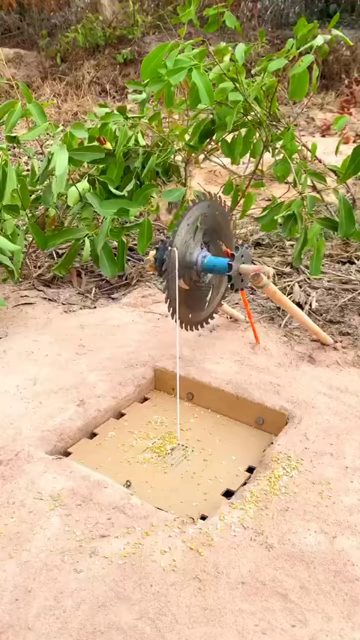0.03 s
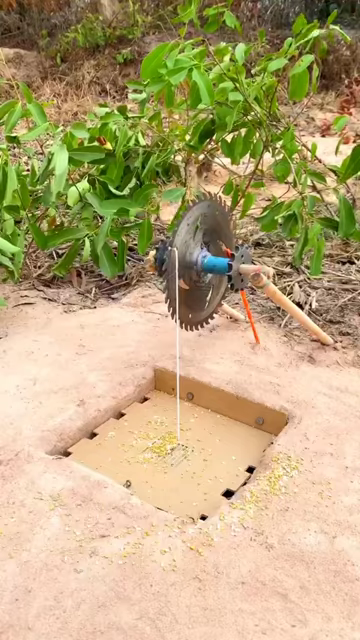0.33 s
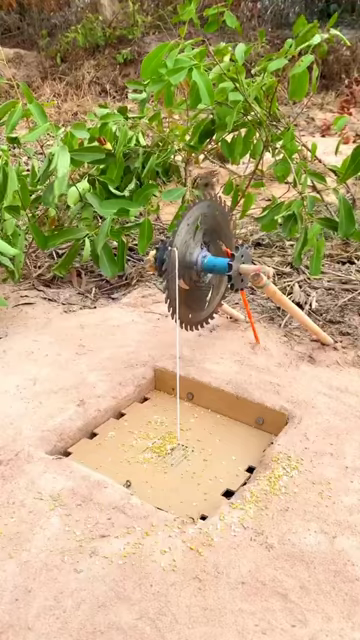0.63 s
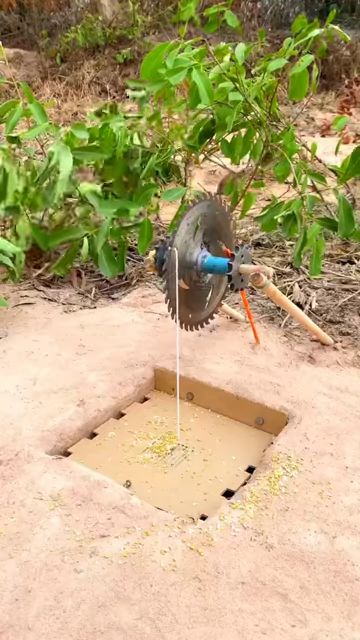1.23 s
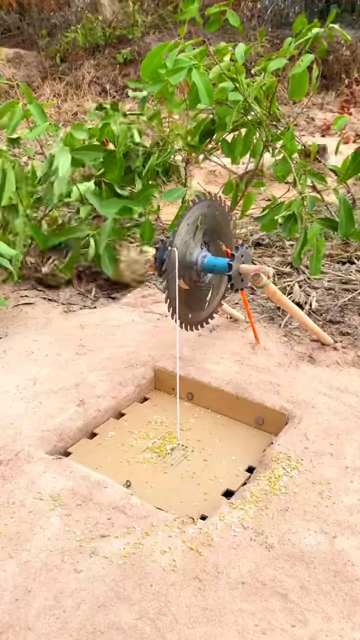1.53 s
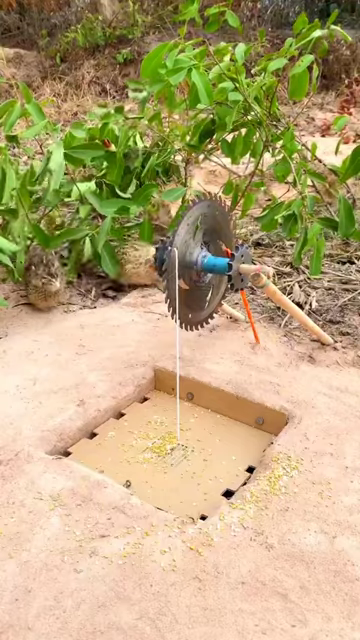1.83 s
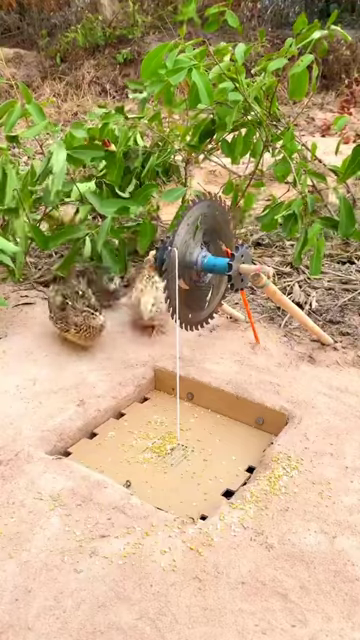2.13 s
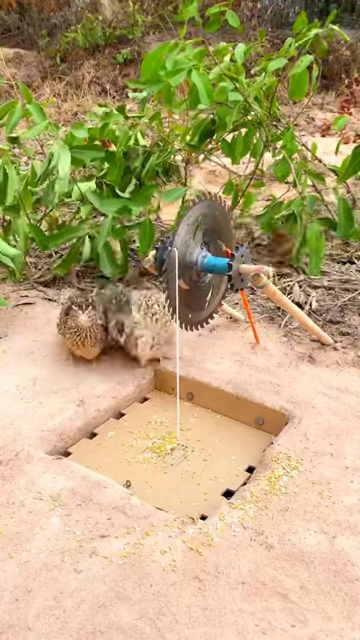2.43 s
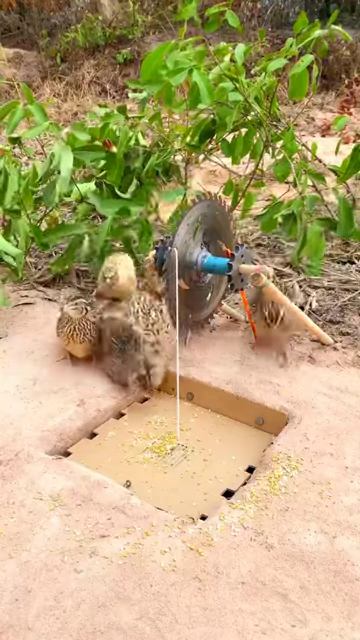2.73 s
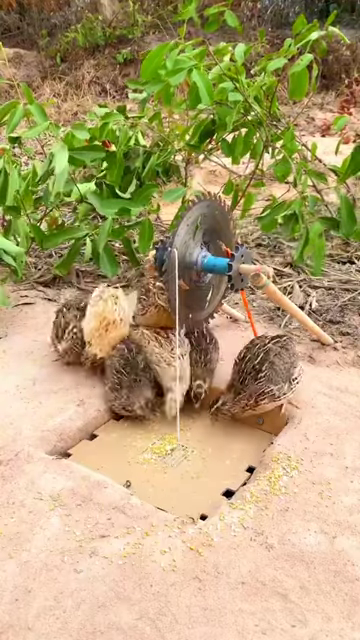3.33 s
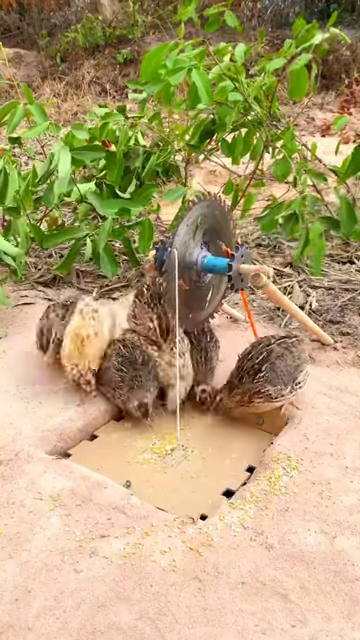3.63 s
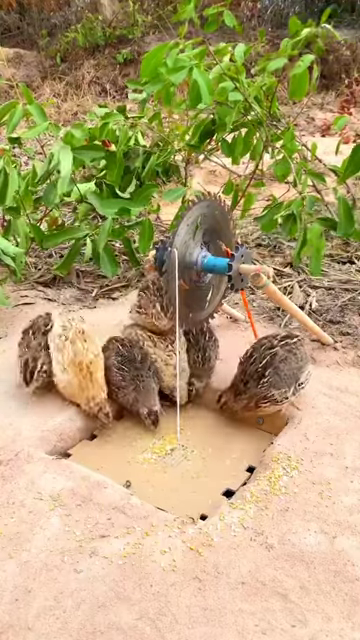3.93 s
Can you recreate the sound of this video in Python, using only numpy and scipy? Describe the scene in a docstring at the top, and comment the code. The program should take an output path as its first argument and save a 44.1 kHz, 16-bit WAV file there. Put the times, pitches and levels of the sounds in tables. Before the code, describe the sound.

In a quiet garden, small birds approach with soft footsteps, light rustling and a few faint peeps. Then comes the main sound, a louder flurry of beaks tapping on cardboard nearby, with brief claw scrapes.

```python
"""Quail peck grain off a cardboard flap set over a hollow. Each peck spreads through the card as a
bending wave, in which high notes travel faster: the tick arrives first, the low thump a moment later.
The birds also patter over dry ground and push through a leafy bush. Leaves rustle, twigs snap,
claws scrape and faint peeps sound over the low rumble of a quiet garden."""
import sys
import numpy as np
from scipy import signal
from scipy.fft import rfft, irfft, next_fast_len
from scipy.io import wavfile
from scipy.ndimage import map_coordinates

SR = 44100
rng = np.random.default_rng(int(sys.argv[2]) if len(sys.argv) > 2 else 0)


def pcm_store(signal):
    """Save signal as 16-bit PCM."""
    levels = np.round(np.clip(np.atleast_2d(signal), -1, 1) * 32767)
    wavfile.write(sys.argv[1], SR, levels.astype(np.int16).T)


N = 176400
SIZE = 16384  # samples in one short sound; HZ and T are its frequencies and times
HZ, T = np.fft.rfftfreq(SIZE, 1 / SR) + 1e-3, np.arange(SIZE) / SR
LEAD_S = 256 / SR  # spare time ahead of a hit, so its start is not cut off

# The card's low modes (notes it rings at). Each row: pitch in Hz, width in Hz, relative level in dB.
KNOCK_MODES = [(283.3, 79, 7), (432, 69, -1.5)]
# The card's high modes. Each row: pitch in Hz, width in Hz, relative level in dB.
TICK_MODES = [(675, 160, 0), (1130, 260, -1.5), (1670, 270, -7), (2380, 310, -14.5), (3090, 480, -14.5),
              (3800, 600, -25), (5400, 1700, -25.5), (10000, 4000, -34)]


def amp(db):
    """Turn decibels into a number to multiply by."""
    return 10 ** (np.asarray(db) / 20)


def even_energy(x):
    """Give a short sound the energy of 30 ms at strength 1."""
    return x / np.sqrt(np.sum(x ** 2) / (0.03 * SR) + 1e-20)


def along(points, hz):
    """Read between (Hz, value) points, with octaves evenly spaced."""
    freqs, values = np.transpose(points)
    return np.interp(np.log(hz + 1), np.log(freqs + 1), values)


def add(track, start, x):
    """Mix x into the track at a start time in seconds."""
    i = max(round(start * SR), 0)
    track[i:i + len(x)] += x[:max(N - i, 0)]


def wobble(rate, size=N):
    """A smooth curve through `rate` random values a second."""
    return map_coordinates(rng.standard_normal(int(size * rate / SR) + 4), [np.arange(size) * rate / SR])


def level(rows, flutter_db, rate):
    """Follow (seconds, dB) points, with a random flutter."""
    return amp(np.interp(np.arange(N) / SR, *np.transpose(rows)) + flutter_db * wobble(rate))


def filtered(x, response):
    """Turn each frequency of x up or down by response(hz)."""
    padded = next_fast_len(N + SR // 2)
    return irfft(rfft(x, padded) * response(np.fft.rfftfreq(padded, 1 / SR)), padded)[:N]


def coloured(x, colour):
    """Shape the tone of x by (Hz, dB) points and bring it to strength 1."""
    x = filtered(x, lambda hz: amp(along(colour, hz)))
    return x / np.sqrt(np.mean(x ** 2) + 1e-20)


def resonance(hz, width):
    """How one mode answers each frequency; a wider mode dies away sooner."""
    return 1j * HZ * width / (hz * hz - HZ ** 2 + 1j * HZ * width)


def ground():
    """Dull shuffling on the soil over an uneven low rumble."""
    # How loud each is over time. Each row: time in seconds, relative level in dB.
    shuffle_levels = [(0.0, -69.5), (0.39, -63.5), (0.54, -75), (0.84, -65.5), (1.08, -50), (1.22, -48.5),
                      (1.46, -71), (1.62, -68.5), (1.86, -59.5), (2.39, -58.5), (2.73, -51), (2.96, -41),
                      (3.3, -43), (3.35, -28), (3.46, -41), (3.67, -40.5), (3.87, -46.5), (3.96, -41)]
    rumble_levels = [(0.0, -77), (0.07, -41.5), (0.13, -89), (0.45, -65), (0.51, -86), (0.89, -74),
                     (1.01, -53.5), (1.12, -50), (1.16, -38.5), (1.31, -74), (1.92, -56.5), (1.93, -66),
                     (2.48, -52.5), (2.53, -74), (2.68, -44), (2.72, -76), (2.75, -44), (3.26, -56),
                     (3.29, -39), (3.35, -61), (3.41, -52), (3.48, -59), (3.6, -39), (3.64, -54),
                     (3.77, -48), (3.79, -41), (3.88, -43), (3.9, -33.5), (3.95, -46.5), (3.97, -32)]
    # The tone of each. Each row: frequency in Hz, relative level in dB.
    soil_colour = [(40, -8), (120, 14.5), (220, -5), (320, 4.5), (600, -6), (900, -27), (2200, -28.5),
                   (5000, -44.5)]
    rumble_colour = [(15, -14), (45, 1.5), (100, 0), (170, -12.5), (400, -16.5), (1500, -70)]
    shuffle = coloured(rng.standard_normal(N), soil_colour) * level(shuffle_levels, flutter_db=2, rate=16)
    rumble = coloured(rng.standard_normal(N), rumble_colour) * level(rumble_levels, flutter_db=-2, rate=5)
    return amp(-5.5) * shuffle + amp(0.5) * rumble


def leaves():
    """Leaves slide over feathers with a hiss and many small crackles."""
    # The rustle before and during feeding. Each row: time in seconds, relative level in dB.
    walking = [(0.0, -75), (0.06, -74.5), (0.09, -66), (0.2, -77.5), (0.28, -65), (0.35, -71), (0.36, -63),
               (0.41, -71.5), (0.73, -78.5), (0.74, -73), (0.86, -78.5), (0.88, -68.5), (0.91, -69),
               (0.94, -74), (0.96, -67), (1.25, -53), (1.25, -48), (1.28, -60), (1.33, -66.5), (1.6, -66),
               (1.69, -73), (1.73, -61), (1.79, -71.5), (1.95, -63), (2.14, -71.5), (2.32, -65.5),
               (2.36, -72), (2.38, -63.5), (2.4, -73.5), (2.41, -54.5), (2.43, -67), (2.47, -61.5),
               (2.49, -69.5), (2.62, -65)]
    feeding = [(2.64, -56), (2.74, -72.5), (2.8, -75), (2.87, -69), (2.92, -65), (2.96, -62.5), (3.02, -74),
               (3.06, -65), (3.11, -60.5), (3.15, -73.5), (3.22, -81), (3.27, -71), (3.33, -66),
               (3.37, -66), (3.43, -65), (3.49, -71), (3.52, -77), (3.58, -55), (3.65, -80), (3.69, -63),
               (3.74, -77.5), (3.79, -60), (3.84, -69), (3.9, -65.5), (3.99, -65)]
    # The tone of hiss and crackle. Each row: frequency in Hz, relative level in dB.
    hiss_colour = [(200, 10), (600, 17.5), (1000, 1), (2400, 7), (3500, 2), (4700, 3), (6300, -1),
                   (9000, 0), (11500, 1), (16000, -6.5)]
    crackle_colour = [(300, -15), (700, 5.5), (1200, 5.5), (2500, -5.5), (3600, -10), (4700, 6.5),
                      (6500, -12), (12000, -20)]
    cracks_per_s, usual_push = 700, amp(-50.5)
    push = level(np.vstack([walking, feeding]), flutter_db=2.3, rate=60)
    cracks = (rng.random(N) < cracks_per_s / SR) * rng.choice([-1, 1], N)
    sizes = amp(4 * np.minimum(rng.exponential(size=N), 4))
    # With a harder push, the crackle grows faster than the hiss.
    crackle = coloured(cracks * sizes, crackle_colour) * usual_push * (push / usual_push) ** 1.34
    hiss = coloured(rng.standard_normal(N), hiss_colour) * push
    return amp(4) * hiss + amp(-5) * crackle


def peeps():
    """The birds call in short, husky, sliding notes."""
    # Each row: start in seconds, length in seconds, first pitch in Hz, last pitch in Hz, level in dB.
    calls = [(0.039, 0.067, 1276, 1208, -60), (0.064, 0.041, 2300, 1690, -62.5),
             (0.163, 0.038, 2900, 2970, -74.5), (0.288, 0.025, 2110, 1870, -69),
             (0.461, 0.053, 2330, 2650, -67.5), (.498, 0.049, 755, 670, -58.5),
             (0.499, 0.041, 1240, 1326, -65.5), (0.718, 0.043, 1994, 1580, -65.5),
             (0.795, 0.038, 1095, 960, -68.5), (0.946, 0.031, 2340, 2210, -63.5),
             (1.791, 0.048, 1980, 1890, -72), (1.993, 0.049, 1302, 1345, -66.5),
             (2.059, 0.053, 1080, 1216, -61.5), (2.222, 0.044, 1166, 1260, -64),
             (2.975, 0.074, 2050, 2260, -54), (3.217, 0.034, 1310, 1440, -58),
             (3.589, 0.023, 3050, 2960, -49.5)]
    out = np.zeros(N)
    for start, length, start_hz, end_hz, db in calls:
        progress = np.minimum(T / length, 1)
        pitch = start_hz + (end_hz - start_hz) * progress
        rasp = wobble(rate=550, size=SIZE)
        phase = 2 * np.pi * np.cumsum(pitch) / SR + rasp
        flutter = amp(3.8 * wobble(rate=135, size=SIZE))
        note = (np.sin(phase) + amp(-20) * np.sin(2 * phase)) * flutter
        add(out, start, amp(db) * even_energy(note * np.sin(np.pi * progress)))
    return out


def snaps():
    """A burst of breaking fibres rings a twig's two broad modes."""
    # Each row: start in seconds, level in dB, pitch in Hz, seconds to fade by 60 dB.
    breaks = [(.078, -60.5, 1300, 0.11), (0.36, -64, 3080, 0.15), (0.456, -61.5, 1760, 0.12),
              (0.794, -66.5, 1830, 0.1), (0.9279, -51.5, 2000, 0.039), (.939, -49.5, 1950, 0.028),
              (1.017, -67.5, 2360, 0.0066), (1.109, -53.5, 2400, 0.073), (1.228, -53.5, 1300, 0.031),
              (1.253, -53, 2530, 0.061), (1.264, -57.5, 2830, 0.02), (2.409, -64.5, 1840, 0.082),
              (2.429, -62, 1200, 0.03), (2.641, -53, 2080, 0.011), (3.174, -64.5, 1330, 0.009)]
    out = np.zeros(N)
    for start, db, hz, fade_s in breaks:
        fibres = rng.standard_normal(SIZE) * amp(-60 * T / fade_s)
        width = hz / 3.5
        twig = resonance(hz, width) - 0.15 * resonance(2.58 * hz, 2 * width)
        add(out, start, amp(db) * even_energy(irfft(rfft(fibres) * twig)))
    return out


def hollow(x):
    """The space under the card adds a short blur of echoes, longest in the bass."""
    # Each row: frequency in Hz, seconds to fade by 60 dB.
    ring_times = [(130, 0.13), (400, 0.06), (1500, 0.028), (8000, 0.11)]
    hz, t, noise = signal.stft(rng.standard_normal(SIZE), SR, nperseg=256)
    fade_s = along(ring_times, hz)[:, None]
    tail = signal.istft(noise * amp(-60 * t / fade_s) / np.sqrt(fade_s), SR, nperseg=256)[1]
    return signal.fftconvolve(x, tail / np.linalg.norm(tail))[:N]


def card(modes, tuning=1, scatter_db=3.5):
    """The card's modes die fast, and each spot touched rings a different mix of them."""
    return sum((-1) ** k * amp(db + scatter_db * rng.standard_normal()) * resonance(hz * tuning, w) ** 2
               for k, (hz, w, db) in enumerate(modes))


def bright(tilt_db):
    """Each contact has its own brightness: tilt the tone by so many dB per octave."""
    return amp(tilt_db * np.log2(np.clip(HZ, 500, 5000)))


def bending_wave(spectrum):
    """A ripple crosses the card; four times the frequency takes half the time."""
    travel_s = 0.004  # at 1000 Hz
    cycles = 2 * travel_s * np.sqrt(1000 * HZ) + HZ * (LEAD_S - travel_s / 2)
    return even_energy(irfft(spectrum * np.exp(-2j * np.pi * cycles)))


def thud(thump_db, knock_db, thump_hz, force=1, tuning=1):
    """The lowest mode thumps and the next ones give a dull knock."""
    soft_force = force / (1 + (HZ / (605 * tuning)) ** 6)  # a soft hit has little treble
    thump = bending_wave(soft_force * resonance(thump_hz, width=74) ** 2)
    knock = bending_wave(soft_force * card(KNOCK_MODES, tuning))
    return amp(thump_db) * thump + amp(knock_db) * knock


def scratches():
    """Short scratchy contacts ring the card's high modes: claw scrapes, and a last peck starting."""
    # Each row: start in seconds, length in seconds, level in dB, brightness in dB per octave.
    touches = [(2.85, 0.022, -63.5, 15), (3.274, 0.014, -51.5, 2.5), (3.554, 0.035, -47.5, 4.5),
               (3.594, 0.017, -43, 0.5), (3.608, 0.027, -52.5, 0), (3.77, 0.037, -46, -1.5),
               (3.992, 0.036, -33, 1)]
    out = np.zeros(N)
    for start, length, db, tilt_db in touches:
        force = rng.standard_normal(SIZE) ** 3 * np.sin(np.pi * np.minimum(T / length, 1))
        spot = card(TICK_MODES) * bright(tilt_db)
        add(out, start, amp(db) * even_energy(irfft(rfft(force) * spot)))
    return out


def steps(roll_s=0.016):
    """Soft feet roll onto the ground and stir only the low modes."""
    # Each row: start in seconds, thump and knock levels in dB, thump and knock pitches in Hz.
    footfalls = [(0.026, -49, -45.5, 135, 288), (0.278, -57, -63, 110, 301), (.595, -71, -79, 137, 291),
                 (0.724, -63, -68, 117, 302), (1.04, -47, -60.5, 115, 288), (1.088, -47.5, -52.5, 113, 287),
                 (1.147, -30.5, -41.5, 108, 309), (1.382, -49.5, -44.5, 122, 289),
                 (1.873, -44, -45.5, 111, 292), (1.901, -44.5, -54.5, 120, 306),
                 (2.088, -50.5, -51.5, 139, 284), (2.457, -51.5, -63, 121, 293),
                 (2.927, -34, -40.5, 137, 304), (2.992, -38, -72, 126, 290),
                 (3.128, -37.5, -43.5, 150, 356), (3.204, -38.5, -67, 106, 285),
                 (3.318, -40, -33, 161, 377), (3.77, -31, -70, 177, 283), (3.793, -26.5, -42.5, 148, 281),
                 (3.844, -37.5, -79, 134, 282), (3.908, -32.5, -56, 154, 295)]
    out = np.zeros(N)
    for start, thump_db, knock_db, thump_hz, knock_hz in footfalls:
        roll = rng.standard_normal(SIZE) * np.sin(np.pi * np.minimum(T / roll_s, 1))
        force = 1 + amp(-2.5) * rfft(roll / np.linalg.norm(roll))
        tuning = knock_hz / KNOCK_MODES[0][0]
        add(out, start - LEAD_S, thud(thump_db, knock_db, thump_hz, force, tuning))
    return out


def grit(db, fade_s, rise_s=0.001):
    """The frequencies in a dying spray of tiny hits."""
    spray = rng.standard_normal(SIZE) ** 3 * amp(-60 * T / fade_s) * (1 - np.exp(-T / rise_s))
    return amp(db) * rfft(spray / np.linalg.norm(spray))


def pecks(brush_s=0.0071):
    """A beak brushes the grain, hits the card and crushes grit; loose grain chatters after it."""
    # Each row: time in seconds, relative levels of tick, knock and thump in dB,
    # thump pitch in Hz, brightness in dB per octave.
    hits = [(2.640, -43, -37.5, -32.5, 153, -1), (2.776, -49.5, -66, -37, 138, 5),
            (2.847, -40.5, -37.5, -24, 157.4, 0.5), (2.944, -45.5, -47, -30, 131, 9),
            (3.056, -34.5, -28, -20.5, 139, -0.5), (3.089, -33, -35.5, -23, 149, -2),
            (3.263, -30.5, -31, -21, 163, 0.5), (3.306, -42.5, -25.5, -31.5, 143, 2),
            (3.354, -32.5, -38, -26.5, 152, -2), (3.385, -31.5, -24, -17.5, 159, -1.5),
            (3.442, -36.5, -27.5, -25, 152, -2), (3.479, -44.5, -35.5, -37, 133, 0),
            (3.537, -40.5, -34.5, -32, 157, 1.5), (3.592, -42, -32.5, -25.5, 141, -0.5),
            (3.668, -40.5, -35, -34.5, 147, 1.5), (3.684, -50, -59, -33.5, 126, 4.5),
            (3.762, -39.5, -34, -36.5, 183, 0), (3.865, -39.5, -38.5, -31.5, 147, -3),
            (3.907, -44, -42.5, -32.5, 146, 2), (3.949, -38.5, -34, -50, 158, -1.5)]
    out = np.zeros(N)
    for time, tick_db, knock_db, thump_db, thump_hz, tilt_db in hits:
        spot = card(TICK_MODES, tuning=1 + 0.025 * rng.standard_normal()) * bright(tilt_db)
        crush = grit(db=1, fade_s=0.017)
        chatter = grit(db=-5, fade_s=0.15)
        tick = amp(tick_db - 10) * bending_wave((1 + crush + chatter) * spot)
        add(out, time - LEAD_S, tick + thud(thump_db - 3, knock_db - 4.5, thump_hz))
        brush = irfft(rfft(rng.standard_normal(SIZE)) * spot * bright(2.3))
        swell = np.exp((T - T[-1]) / brush_s)  # peaks as the beak lands
        add(out, time - T[-1], amp(tick_db - 25) * even_energy(brush * swell))
    return out


def scene():
    """Mix everything into one channel; only pecks, steps and scratches ring the hollow."""
    contacts = pecks() + steps() + scratches()
    return (contacts + amp(-3) * hollow(contacts) + snaps() + peeps() + leaves() + ground())[None]


def record(dry):
    """The treble has one narrow dip and ends steeply."""
    dip_db, dip_hz, dip_width_hz, top_hz = -22.5, 7373, 632, 12726
    dip = lambda hz: amp(dip_db * np.exp(-((hz - dip_hz) / dip_width_hz) ** 2))
    low_pass = lambda hz: 1 / np.sqrt(1 + (hz / top_hz) ** 80)
    return filtered(dry[0], lambda hz: dip(hz) * low_pass(hz))[None]


dry = scene()
out = record(dry)
pcm_store(out)
```